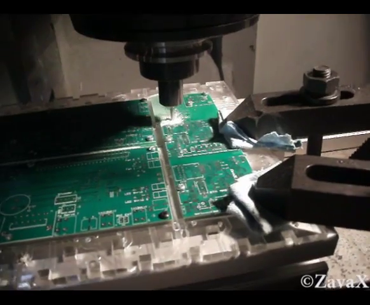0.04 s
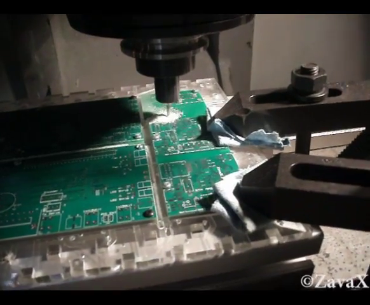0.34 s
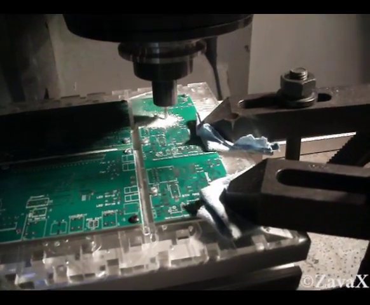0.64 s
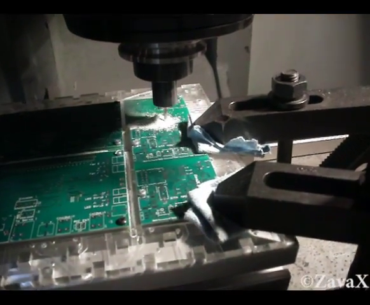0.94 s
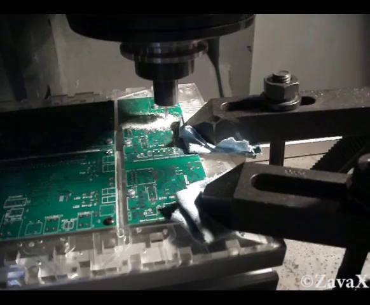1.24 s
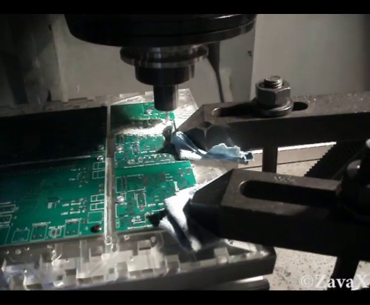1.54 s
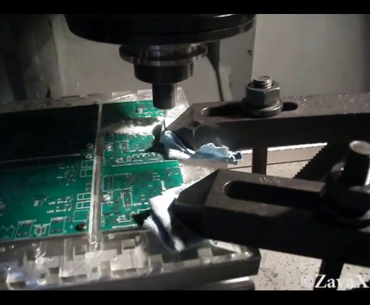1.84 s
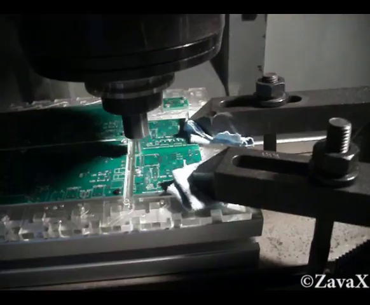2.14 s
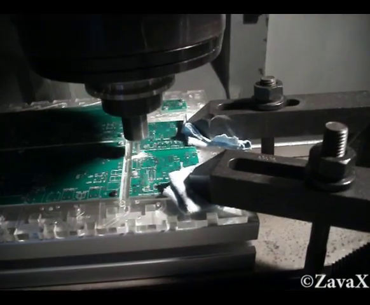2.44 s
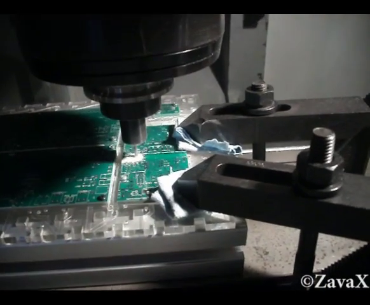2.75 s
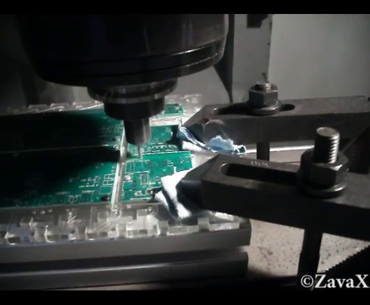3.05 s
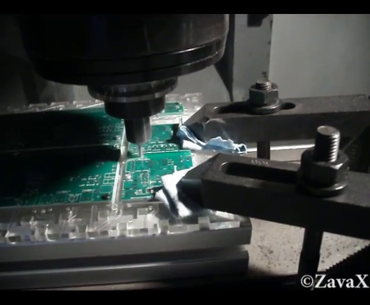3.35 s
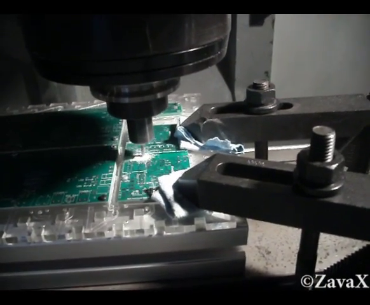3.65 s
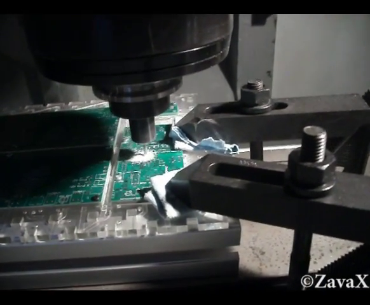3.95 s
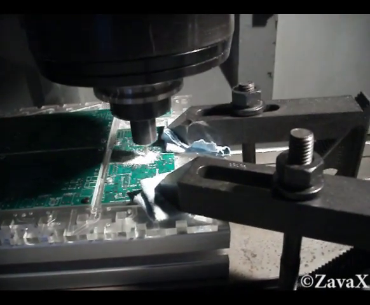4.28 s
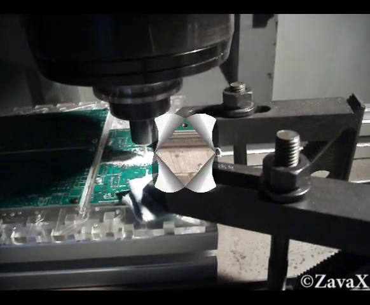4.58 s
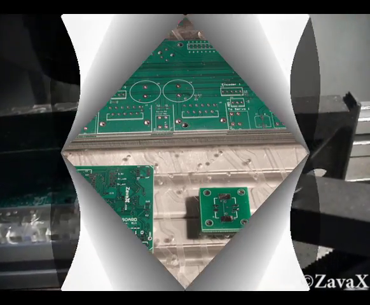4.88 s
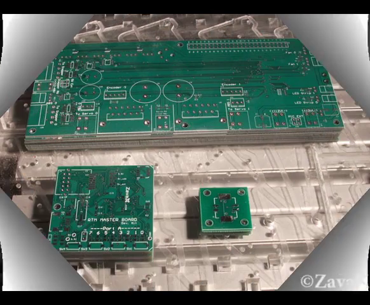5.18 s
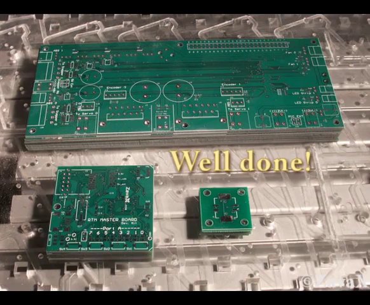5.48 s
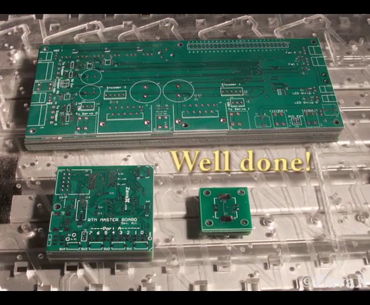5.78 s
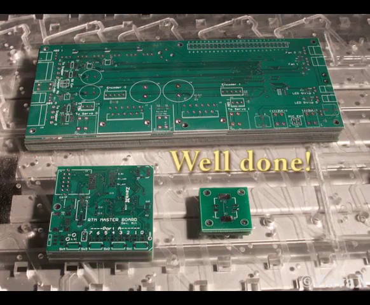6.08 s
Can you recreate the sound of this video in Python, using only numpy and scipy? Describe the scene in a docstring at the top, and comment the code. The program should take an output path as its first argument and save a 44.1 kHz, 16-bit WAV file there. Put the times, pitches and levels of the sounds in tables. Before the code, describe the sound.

A milling spindle whines and hisses at high speed while its cutter rasps through a circuit board in several passes, then the sound stops abruptly.

```python
"""Milling a circuit board panel

Heard close up, from two positions in turn. Spindle air rushes in the housing and the motor drive
whines; the burr rasps once a turn, rings the board and sprays dust. Midway a puff of air crosses
the microphone and a few chips tick; at the end the sound stops abruptly."""
import sys
import numpy as np
from scipy import signal
from scipy.fft import rfft, irfft, next_fast_len
from scipy.io import wavfile
from scipy.ndimage import uniform_filter1d, map_coordinates

SR = 44100
rng = np.random.default_rng(int(sys.argv[2]) if len(sys.argv) > 2 else 0)


def master_out(mix):
    """Clip the mix to full scale and print it as 16-bit PCM to the path in sys.argv[1]."""
    frames = np.transpose(np.atleast_2d(mix))
    ceiling = np.clip(frames, -1, 1)
    pcm = np.round(ceiling * 32767).astype(np.int16)
    wavfile.write(sys.argv[1], SR, pcm)


N = 269892
TIME = np.arange(N) / SR
FREQ = np.maximum(np.arange(N // 2 + 1) * SR / N, 1)
SWITCH_S, STOP_S = 2.148, 5.558   # sound cuts from position 1 to 2; sound stops
SPINDLE_HZ, DRIVE_HZ = 249.7, 244.16


def from_db(db):
    """Decibels to gain."""
    return 10 ** (np.asarray(db) / 20)


def position_gain(first_db, second_db):
    """Gain that steps from position 1 to 2."""
    return from_db(np.where(TIME > SWITCH_S, second_db, first_db))


def unit_rms(x):
    """Scale to rms 1."""
    return x / np.sqrt(np.mean(x ** 2) + 1e-20)


def curve(rows):
    """Straight lines through (time, value) rows."""
    return np.interp(TIME, *np.transpose(rows))


def drift(rate_hz):
    """Slow random curve through knots of spread 1."""
    knots = rng.standard_normal(1000)
    return np.interp(TIME * rate_hz, np.arange(len(knots)), knots)


def gate(start, end, attack_s, release_s):
    """1 between start and end, with linear ramps centred on both."""
    return np.clip(np.minimum((TIME - start) / attack_s, (end - TIME) / release_s) + .5, 0, 1)


def pulse(at_s, hz):
    """One smooth swing of pressure."""
    cycles = (TIME - at_s) * hz
    return np.sin(2 * np.pi * cycles) * np.exp(-np.minimum(3.5 * cycles ** 2, 50))


def colour(x, spectrum, peaks=()):
    """Filter by a (frequency [Hz], level [dB]) outline plus resonant peaks; rms 1."""
    hz, db = np.transpose(spectrum)
    shape_db = np.interp(np.log(FREQ), np.log(hz), db)
    for centre, width, boost_db in peaks:
        shape_db += boost_db / (1 + (2 * (FREQ - centre) / width) ** 2)
    size = next_fast_len(N, real=True)
    gain = np.interp(np.arange(size // 2 + 1) * SR / size, FREQ, from_db(shape_db))
    return unit_rms(irfft(rfft(x, size) * gain, size)[:N])


def resonate(x, modes):
    """Parallel resonators of alternating sign."""
    out = np.zeros(N)
    for k, (hz, width, db) in enumerate(modes):
        r = np.exp(-np.pi * width / SR)
        poles = [1, -2 * r * np.cos(2 * np.pi * hz / SR), r * r]
        out += (-1) ** k * from_db(db) * (1 - r * r) / 2 * signal.lfilter([1, 0, -1], poles, x + 1e-18)
    return out


def tone(hz, wander_rad, waver_db=2):
    """Sine with wandering phase and level; rms about 1."""
    phase = 2 * np.pi * (hz * TIME + rng.random()) + wander_rad * drift(22)
    return np.sqrt(2) * np.sin(phase) * from_db(waver_db * drift(8))


def grains(per_s, spread_db):
    """Impulses of random timing, sign and size; rms 1."""
    hits = rng.random(N) < per_s / SR
    sign = rng.choice([-1, 1], N)
    size = from_db(spread_db * np.minimum(rng.exponential(1, N), 5))
    return unit_rms(hits * sign * size)


def rotor_load(turns, depth_db):
    """Runout loads the burr once a turn, its flutes twice; mean power 1."""
    load = np.cos(2 * np.pi * turns) + .5 * np.cos(4 * np.pi * turns)
    force = from_db(depth_db * load)
    return force / np.sqrt(uniform_filter1d(force ** 2, int(SR / SPINDLE_HZ)))


def low_rumble(ring_gain):
    """The table shakes with the cutting force; faint low bumps come at random."""
    body = [(80, 80, 0)]
    bumps = unit_rms(resonate(resonate(grains(per_s=7, spread_db=-2), body), body))
    shake = unit_rms(resonate(resonate(rng.standard_normal(N), body), body))
    return from_db(-72.5) * bumps + from_db(-47) * ring_gain * shake


def thump():
    """A soft low thump where the sound cuts to the second position."""
    return from_db(-45.5) * pulse(SWITCH_S, hz=65)


# Air spectrum: (frequency [Hz], relative density [dB])
AIR_SPECTRUM = [(25, -23.5), (90, -37.5), (140, -41), (185, -23), (270, -13), (450, -11.5), (700, -10.5),
                (950, -11.5), (1100, -3), (2200, -0.5), (2520, -7.5), (2900, -7), (3800, -3.5), (4700, -13),
                (5700, -6), (6900, -11), (11000, -11), (15700, -13)]
# Housing resonances: (frequency [Hz], width [Hz], boost [dB])
HOUSING_PEAKS = [(1102, 130, 7.5), (1548, 190, 4.5), (1724, 50, -6.5), (1774, 41, 7.5), (2000, 61, 5),
                 (2469, 100, 10.5), (2694, 55, 7.5), (4004, 204, 5.5), (4192, 90, 9.5), (5804, 260, 9),
                 (7360, 200, 6), (7840, 200, 8), (12230, 300, -1.5), (13100, 250, 2.5)]
def spindle_air(turns):
    """Turbulence in the housing; the treble pulses with the rotor."""
    rush = colour(rng.standard_normal(N), AIR_SPECTRUM, HOUSING_PEAKS)
    low = signal.sosfiltfilt(signal.butter(2, 3200, fs=SR, output="sos"), rush)
    high = (rush - low) * rotor_load(turns, depth_db=-3) * position_gain(-1.2, .8)
    return from_db(-23.5) * (low + high) * from_db(.48 * drift(20))


# Machine tones: (frequency [Hz], level at position 1 [dB], at position 2 [dB], phase wander [rad])
AUXILIARY_TONES = [(402.2, -48.5, -48.5, 1.9), (493, -54.5, -56, 1), (537, -52, -49, 1.7),
                   (590.4, -46, -45, 1.4), (1170, -44.5, -42.5, 1.2), (2394, -37.5, -33.5, 0.35),
                   (2720, -50, -43, 0.68), (4040, -43.5, -43.5, 0.83), (4245, -53, -42, 0.55),
                   (6460, -42.5, -58.5, .8)]
def auxiliaries():
    """Fans, pump and bearings hold wavering tones."""
    return sum(position_gain(first_db, second_db) * tone(hz, wander_rad)
               for hz, first_db, second_db, wander_rad in AUXILIARY_TONES)


# Panel resonances: (frequency [Hz], width [Hz], gain [dB])
PANEL_MODES = [(771, 46, 0.5), (841, 41, 4)]
# Drone envelope: (time [s], level [dB])
DRONE_LEVEL = [(0, -47), (1.8, -42), (2.15, -55), (2.6, -42), (3.35, -52), (3.8, -44.5), (4.7, -44),
               (5.46, -38), (5.54, -58)]
def panel_drone():
    """A panel drones in two noise-driven modes."""
    gain = from_db(curve(DRONE_LEVEL) + 2.9 * drift(9))
    return gain * unit_rms(resonate(rng.standard_normal(N), PANEL_MODES))


# Drive harmonics: (order, level at position 1 [dB], at position 2 [dB])
DRIVE_HARMONICS = [(8, -42, -42), (10, -39, -42), (11, -52, -44), (13, -43, -42), (15, -39, -42),
                   (16, -38.5, -35.5), (17, -40.5, -38), (18, -50, -43.5), (22, -52, -47), (24, -39, -44),
                   (25, -43, -43), (27, -41.5, -47), (29, -45.5, -46), (30, -45, -45.5), (32, -45, -43.5),
                   (41, -48, -55), (42, -44.5, -49), (43, -48.5, -50.5), (44, -43, -42.5), (46, -55, -49),
                   (48, -45, -53), (61, -54, -48), (62, -51, -56)]
# Beat of the lower whistle: (time [s], depth [dB])
WHISTLE_BEAT = [(0, 1.2), (3.7, 2), (4.2, 5), (5.5, 5.5)]
# Upper whistle envelope: (time [s], level [dB])
UPPER_WHISTLE_LEVEL = [(0, -33.5), (2.09, -33), (2.18, -46), (2.55, -50), (2.85, -46.5), (3.33, -47.5),
                       (3.6, -41.5), (5.54, -34.5)]
def drive_whine(beat_hz=2.76, crest_s=4.6):
    """Switching harmonics of the motor drive; two stand out as whistles, the lower beating slowly."""
    harmonics = sum(position_gain(first_db, second_db) * tone(order * DRIVE_HZ, wander_rad=.2)
                    for order, first_db, second_db in DRIVE_HARMONICS)
    beat = from_db(curve(WHISTLE_BEAT) * np.cos(2 * np.pi * beat_hz * (TIME - crest_s)))
    lower = position_gain(-39, -34) * beat * tone(23 * DRIVE_HZ, wander_rad=.36, waver_db=1.3)
    upper = from_db(curve(UPPER_WHISTLE_LEVEL)) * tone(45 * DRIVE_HZ, wander_rad=.25, waver_db=1.8)
    return harmonics + lower + upper


# Gusts: (start [s], end [s], hiss [dB], rumble [dB], machine gain [dB])
MIC_GUSTS = [(3.035, 3.092, -21.5, -41.5, -15.5), (3.205, 3.27, -51, -50, 0.5)]
def air_puff(edge_s=.004):
    """Air pops, hisses and rumbles on the microphone; also returns the gain that ducks the machine."""
    hiss = colour(rng.standard_normal(N), [(200, -9.5), (1500, -2.5), (6500, 1.5), (9000, -2),
                                           (15500, -3)])
    rumble = colour(rng.standard_normal(N), [(30, 2), (90, -4.5), (250, -15), (1500, -45)])
    air = from_db(-12) * pulse(at_s=3.0268, hz=750)
    machine_db = np.zeros(N)
    for start, end, hiss_db, rumble_db, gain_db in MIC_GUSTS:
        blowing = gate(start, end, edge_s, edge_s)
        air += blowing * (from_db(hiss_db) * hiss + from_db(rumble_db) * rumble)
        machine_db += blowing * gain_db
    return air, from_db(machine_db)


# Chip impacts: (time [s], relative force [dB], 60 dB decay [s], high-pass [Hz])
CHIP_HITS = [(2.0975, -8, .005, 12000), (2.893, -14, .03, 5000), (3.029, -8.5, .025, 5000),
             (3.1504, -11, .02, 5000), (3.199, -11, .035, 6500), (3.2166, -8, 0.025, 2500),
             (3.2487, -6.5, .045, 8000)]
# Chip ring: (frequency [Hz], width [Hz], gain [dB])
CHIP_RING = [(3400, 900, -5), (5560, 1040, -2), (7270, 550, 1.5), (8100, 600, 3), (10300, 1400, -7),
             (13200, 1800, -13.5)]
def chips():
    """Chips hit the clamps with a tick and a short skitter; small ones tick higher."""
    force = np.zeros(N)
    age = np.arange(SR // 10) / SR
    for at_s, db, t60_s, highpass_hz in CHIP_HITS:
        burst = rng.standard_normal(len(age)) * from_db(-60 * age / t60_s)
        burst[0] += 4   # the tick
        burst = signal.sosfilt(signal.butter(2, highpass_hz, "high", fs=SR, output="sos"), burst)
        start = round(at_s * SR)
        force[start:start + len(age)] += from_db(db) * burst
    return from_db(3) * resonate(force, CHIP_RING)


# Wall contacts: (start [s], end [s], pitch [Hz], level [dB])
WALL_RUBS = [(0, .95, 4744, -38), (0, .45, 3995, -33), (.45, 1.6, 3995, -39), (2.15, 2.39, 4994, -33),
             (2.79, 3.02, 4744, -34), (3.1, 3.36, 4744, -39), (5.24, 5.325, 4194, -30)]
def burr_squeal(turns, ramp_s=.012):
    """The burr sings where it only rubs the slot wall, pulsing once a turn."""
    squeal = np.zeros(N)
    for start, end, hz, db in WALL_RUBS:
        touching = np.clip(np.minimum(TIME - start, end - TIME) / ramp_s, 0, 1)
        phase = 2 * np.pi * (hz / SPINDLE_HZ * turns + rng.random())
        squeal += from_db(db) * touching * np.sqrt(2) * np.sin(phase)
    return squeal * rotor_load(turns, depth_db=5.5) * from_db(1.5 * drift(12))


# Dust spectra at positions 1 and 2: (frequency [Hz], relative density [dB])
DUST_SPECTRUM_1 = [(2500, -38), (3600, -7), (6000, -5), (7100, -4.5), (9000, -1.5), (10200, -1),
                   (10900, -6), (12600, -5.5), (13500, -12.5), (14250, -20), (15000, -8), (16000, -17)]
DUST_SPECTRUM_2 = [(2500, -23.5), (3600, -11), (6000, -7.5), (6900, -12), (8600, -2), (11700, -3),
                   (12400, -9.5), (13300, -10), (14500, -8.5), (16000, -13)]
# Their resonances: (frequency [Hz], width [Hz], boost [dB])
DUST_PEAKS_1 = [(6520, 140, 3), (7640, 300, -12.5), (8150, 220, 7), (10390, 350, 5.5), (12300, 300, 3)]
DUST_PEAKS_2 = [(7940, 400, 3), (10570, 420, 4.5), (12060, 380, 9.5), (12240, 240, -10.5)]
# Echo off a nearby edge: (time [s], lag [s])
EDGE_ECHO = [(0, .000566), (1.3, .000568), (2.1, .0006), (2.4, .000576), (3.6, .00058), (4.8, .000611),
             (5.5, .00062)]
def dust_hiss(turns, depth_db):
    """Fine crackle from the cutting edge, combed by an inverted echo that shifts as the tool travels."""
    crackle = grains(per_s=14000, spread_db=2) * rotor_load(turns, depth_db)
    first = colour(crackle, DUST_SPECTRUM_1, DUST_PEAKS_1)
    second = colour(crackle, DUST_SPECTRUM_2, DUST_PEAKS_2)
    direct = from_db(3) * np.where(TIME > SWITCH_S, second, first)
    echo = map_coordinates(direct, [(TIME - curve(EDGE_ECHO)) * SR], order=3, mode="mirror")
    return (direct - .42 * echo) * from_db(.37 * drift(30))


# Board and tool resonances: (frequency [Hz], width [Hz], gain [dB])
BOARD_MODES = [(3462, 110, -6), (3760, 44, -5), (3967, 160, -8), (4518, 43, 1.5), (4750, 45, 1.5),
               (4975, 100, -.5), (5280, 64, 1.5), (5530, 60, -9.5), (5670, 220, -15), (6050, 92, -12.5)]
def board_ring(turns, depth_db):
    """Teeth strike alike on every turn and fibres snap at random; the ring pulses with the load."""
    one_turn = irfft(np.exp(2j * np.pi * rng.random(89)))
    teeth = unit_rms(map_coordinates(one_turn, [turns % 1 * len(one_turn)], order=1, mode="grid-wrap"))
    force = grains(per_s=16000, spread_db=2.5) + .32 * teeth
    band = signal.butter(2, [3200, 6300], "band", fs=SR, output="sos")
    ring = unit_rms(signal.sosfilt(band, resonate(force, BOARD_MODES)))
    return ring * rotor_load(turns, depth_db) * from_db(drift(30))


# Passes: (start [s], end [s], ring [dB], ring hold [s], ring fade [dB/s], dust [dB], dust fade [dB/s])
CUT_PASSES = [(-.1, 1.56, -27, .85, 3, -24, 4), (1.587, 1.915, -29.5, .15, 5, -31.5, -2),
              (1.912, 2, -35, .02, 58, -36.5, 32), (2.376, 2.807, -21.3, .13, 1.5, -27.5, 5),
              (3.355, 3.405, -23.5, .04, 0, -32.5, 0), (3.438, 5.325, -23.5, .45, 10, -29, 1.8),
              (5.325, 5.8, -36, .1, 10, -34, 35)]
def pass_gains(throb_hz=14.3, throb_db=1.5, crest_s=.566):
    """Ring and dust gains: each pass bites, holds, eases and runs out, over a steady grazing."""
    grazing = position_gain(-6.5, 0)
    ring_power = (grazing * from_db(-40.5)) ** 2
    dust_power = (grazing * from_db(-42.5)) ** 2
    for start, end, ring_db, hold_s, ring_fade, dust_db, dust_fade in CUT_PASSES:
        engaged = gate(start, end, attack_s=.022, release_s=.03)
        age = np.clip(TIME - start, 0, end - start)
        ring_power += (engaged * from_db(ring_db - ring_fade * np.maximum(age - hold_s, 0))) ** 2
        dust_power += (engaged * from_db(dust_db - dust_fade * age)) ** 2
    throbbing = np.clip((1.1 - TIME) / .4, 0, 1)   # first pass only
    throb = throbbing * np.cos(2 * np.pi * throb_hz * (TIME - crest_s))
    return np.sqrt(ring_power) * from_db(throb_db * throb), np.sqrt(dust_power)


# Load swing per turn, scaled below for ring and dust: (time [s], swing [dB])
LOAD_SWING = [(0, 5), (1.3, 4), (2.1, 3), (2.5, 1.8), (2.78, 2), (2.9, 5), (3.5, 1.8), (4.5, 2.5),
              (5.5, 3.5)]
def burr_cut(turns, ring_gain, dust_gain):
    """The burr rasps through the board; a light cut touches on one side of the turn and swings more."""
    swing_db = curve(LOAD_SWING)
    return ring_gain * board_ring(turns, .55 * swing_db) + dust_gain * dust_hiss(turns, .5 * swing_db)


def scene():
    """Machine, cut and small events, the same in both channels."""
    turns = SPINDLE_HZ * TIME + .0046 * drift(15)
    ring_gain, dust_gain = pass_gains()
    machine = burr_cut(turns, ring_gain, dust_gain) + burr_squeal(turns)
    machine += spindle_air(turns) + drive_whine() + panel_drone() + auxiliaries()
    puff, machine_gain = air_puff()
    mono = machine_gain * machine + chips() + puff + low_rumble(ring_gain) + thump()
    return np.array([mono, mono])


def record(dry, dc_offset=-.008, stop_ramp_s=.0063, cutoff_hz=15700):
    """Small DC offset, abrupt stop, steep low-pass."""
    running = np.clip((STOP_S - TIME) / stop_ramp_s + .5, 0, 1)
    lowpass = signal.ellip(12, .1, 90, cutoff_hz, fs=SR, output="sos")
    return signal.sosfilt(lowpass, (dry + dc_offset) * running + 1e-18)


dry = scene()
out = record(dry)
master_out(out)
```